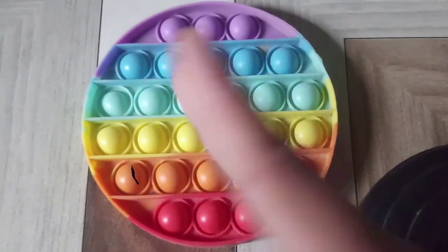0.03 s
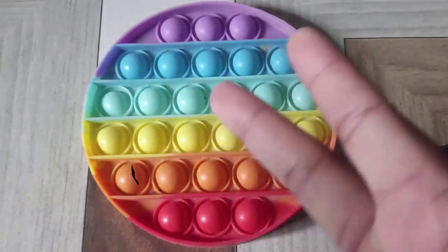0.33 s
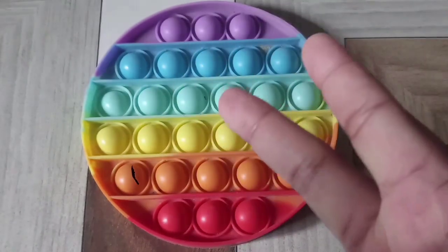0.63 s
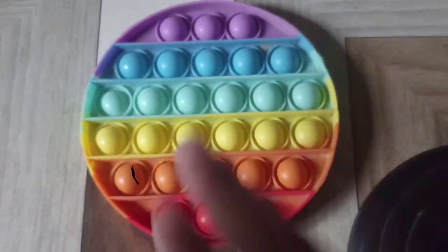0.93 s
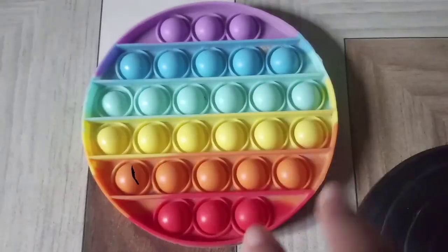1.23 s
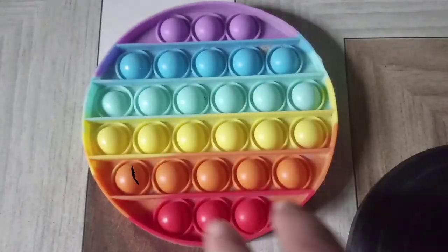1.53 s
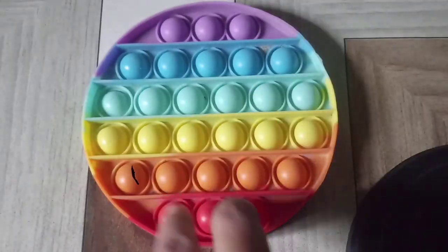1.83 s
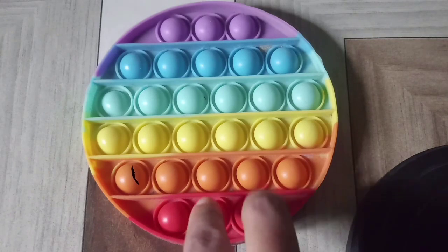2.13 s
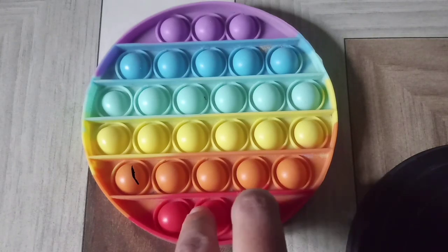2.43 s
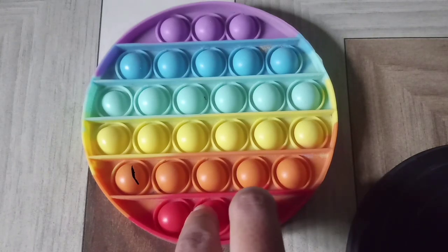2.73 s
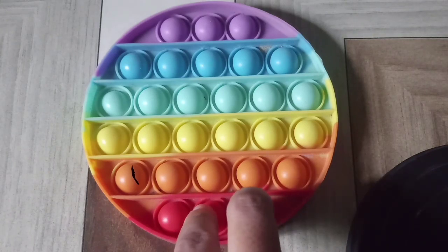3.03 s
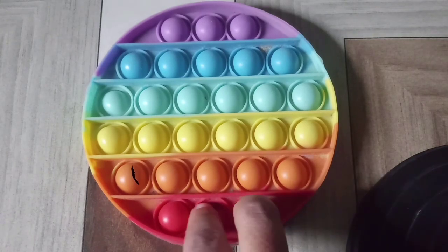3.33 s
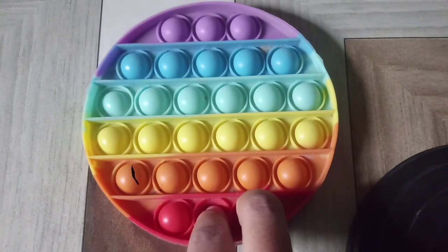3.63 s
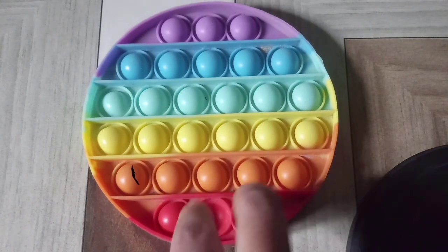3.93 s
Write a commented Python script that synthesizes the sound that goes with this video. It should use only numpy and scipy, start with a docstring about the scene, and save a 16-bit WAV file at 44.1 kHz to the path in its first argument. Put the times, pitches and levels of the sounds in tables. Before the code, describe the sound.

A silicone bubble toy pops twice, close to the microphone in a bare room. At first there is only faint hiss and low rumble. From about 1 to 2.5 seconds fingers rub very softly on the toy, with a tiny tick. The two sharp pops come at about 3.1 and 3.4 seconds, each ringing briefly in the room. A last faint tick and rub follow near 3.9 seconds.

```python
"""A silicone bubble toy on the floor of a bare room, one small microphone close to it.
At first there is only faint hiss and a rumble that swells in the room's low resonances.
From about a second in, two fingers settle on the toy, rub on it and press. Just after three seconds
two domes snap through, one after the other: each a millisecond crack that bounces off the floor and
the near walls and rings out in the room. A last tick and rub follow as the hiss sinks."""
import sys
import numpy as np
from scipy import signal
from scipy.fft import rfft, irfft, next_fast_len
from scipy.io import wavfile
from scipy.ndimage import map_coordinates

SR = 44100
rng = np.random.default_rng(int(sys.argv[2]) if len(sys.argv) > 2 else 0)


def to_wav(s):
    """Save 16-bit WAV."""
    ch = np.atleast_2d(s).T  # columns
    pcm = np.round(np.clip(ch, -1, 1) * 32767)  # PCM
    wavfile.write(sys.argv[1], SR, pcm.astype(np.int16))


N = 176400

# spectra of the room's hiss and steady rumble: frequency_hz, relative_db
HISS_SPECTRUM = [(150, -11.5), (300, 1.5), (450, -4), (700, -5.5), (1000, -9), (1600, -13.5), (3000, -14.5),
                 (4300, -14.5), (5500, -21.5), (6500, -17.5), (7100, -10), (7700, -20), (10000, -22.5),
                 (15500, -27)]
RUMBLE_SPECTRUM = [(20, -18.5), (35, -14), (50, -8), (70, -2), (85, -5.5), (100, 2), (135, -3), (165, -14),
                   (200, -12), (300, -21), (400, -40.5)]
# course of the hiss: time_s, level_db
HISS_LEVEL = [(0, -72), (.7, -74), (1.3, -71.5), (2.9, -73.5), (3.4, -73), (3.75, -77.5), (4, -81.5)]
# swells of the room's low resonances: middle_s, half_length_s, pitch_hz, level_db
ROOM_SWELLS = [(0.292, .055, 104.9, -52.5), (.49, .05, 134.2, -57), (.64, 0.048, 104, -59),
               (1.1, 0.063, 103.3, -51.5), (1.1, 0.065, 137.3, -64), (1.432, 0.12, 98.1, -56.5),
               (1.41, 0.086, 139.2, -66.5), (2.15, 0.063, 198, -58), (2.202, 0.092, 224.7, -57),
               (2.16, 0.081, 119.4, -64), (2.66, .07, 132, -53), (2.78, .06, 102, -57),
               (3.09, .07, 133.4, -57.5), (3.208, 0.069, 98.4, -53.5), (3.38, 0.056, 98.2, -56.5),
               (3.758, 0.052, 105.8, -56.5)]
RUMBLE_DB, WANDER_RAD, WANDER_KNOTS_PER_S = -63.5, 0.45, 14

# soft rubs on the toy and, in the 217 Hz row, a low swell of the room's resonance:
# middle_s, half_length_s, centre_hz, half_width_hz, glide_hz_per_s, level_db
NOISE_SWELLS = [(1.102, .05, 3360, 200, -3, -81.5), (1.279, 0.097, 3560, 110, -1400, -78),
                (1.404, .05, 2930, 600, -4000, -77), (1.736, 0.04, 4980, 453, 5, -72),
                (1.741, 0.066, 7250, 1500, 0, -73.5), (1.753, 0.077, 1390, 805, 1, -75.5),
                (1.84, .13, 620, 80, -2, -72), (2.102, 0.049, 3370, 400, 2, -79),
                (2.311, 0.083, 4600, 650, -2500, -76.5), (2.438, 0.17, 638, 70.5, -200, -67),
                (2.484, 0.061, 2470, 494, -4, -79), (2.192, .09, 217, 45.7, -3, -57.5),
                (3.88, .03, 6800, 1500, 0, -78)]
# small ticks of the silicone: start_s, level_db
TICKS = [(2.195, -64), (3.855, -71)]
# spectrum of a tick: frequency_hz, relative_db
TICK_SPECTRUM = [(200, 8), (700, 10), (2000, -1), (5000, -7), (9000, -5), (14000, -39)]
TICK_T60_S = 0.24

# domes snapping through: start_s, gain_db, pitch_ratio, floor_bounce_ms, thud_db, tail_db, t60_ratio
POPS = [(3.1375, 4.6, 0.977, 0.48, -27.5, -27.5, 1.01), (3.4137, 4.6, 1.015, 0.46, -32.5, -29.5, 0.94)]
# modes of a dome: pitch_hz, relative_db, t60_s
DOME_MODES = [(2270, -16.5, .005), (3750, -13, .0045), (5580, -1.5, 0.0031), (8200, -14.5, 0.0019),
              (11200, -26, .002)]
THUD_HZ, THUD_T60_S, SNAP_ATTACK_S, BOUNCE_DB = 540, .007, .00004, -7.5
# echoes off near walls and furniture: delay_s, gain_db
WALL_ECHOES = [(.0053, -22.5), (0.0105, -19.5), (0.0137, -22.5), (.0252, -22), (.028, -23)]
# spectrum of the room's tail, one list for each pop: frequency_hz, relative_db
TAIL_SPECTRA = [
    [(100, -63.5), (170, -19.5), (260, -10), (400, -15), (540, -19.5), (730, -9), (900, -17), (1100, -16),
     (1550, -17.5), (1850, -8), (2800, -10), (3800, -4), (5200, -0.5), (6200, -4), (7300, -9), (8700, -14),
     (9600, -27.5), (15000, -36)],
    [(100, -60.5), (170, -21.5), (240, -9), (400, -13), (620, -10.5), (900, -32), (1250, -14), (1550, -15),
     (1850, -8), (2800, -11), (3800, -6.5), (5300, 0), (6200, -3), (7300, -5), (8700, -9.5), (9600, -21),
     (12000, -22.5), (15000, -36.5)],
]
# reverberation time of the bare room: frequency_hz, t60_s
ROOM_T60 = [(250, .38), (800, 0.5), (1900, 0.58), (3200, 0.53), (5500, .57), (8500, 0.46), (10000, 0.28),
            (14000, .35)]
EARLY_DB, EARLY_T60_S, ROOM_BUILD_S = 5, 0.14, 0.0046  # the first dense reflections die faster

MIC_LOW_HZ, MIC_HIGH_HZ = 220, 8800
PEAK_CEILING, BAND_LIMIT_HZ = 1.2, 15600


def amp(db):
    """Decibels to gain."""
    return 10 ** (np.asarray(db) / 20)


def unit_rms(x):
    """Scaled to rms 1."""
    return x / np.sqrt(np.mean(x ** 2) + 1e-20)


def curve_at(points, hz):
    """(frequency_hz, value) points read on a log frequency axis."""
    knots_hz, values = np.transpose(points)
    return np.interp(np.log(hz + 1), np.log(knots_hz + 1), values)


def filtered(x, response):
    """x through a filter given as gain against frequency."""
    size = next_fast_len(len(x) + 8192)
    return irfft(rfft(x, size) * response(np.fft.rfftfreq(size, 1 / SR)), size)[:len(x)]


def noise(spectrum, count=N):
    """Coloured noise of rms 1."""
    return unit_rms(filtered(rng.standard_normal(count), lambda hz: amp(curve_at(spectrum, hz))))


def wobble(t, knots_per_s):
    """A smooth random curve."""
    return map_coordinates(rng.standard_normal(64), [t * knots_per_s], mode="mirror")


def swell(t, half_length_s):
    """A bell-shaped rise and fall around t = 0."""
    return np.exp(-.5 * (t / half_length_s) ** 2)


def add(track, start_s, sound):
    """Mix a sound in at start_s."""
    part = track[round(start_s * SR):][:len(sound)]
    part += sound[:len(part)]


def room_tone():
    """Hiss that sinks after the pops, and rumble that swells at the room's low resonances."""
    t = np.arange(N) / SR
    rumble = amp(RUMBLE_DB) * noise(RUMBLE_SPECTRUM)
    hiss = amp(np.interp(t, *np.transpose(HISS_LEVEL))) * noise(HISS_SPECTRUM)
    for middle_s, half_length_s, pitch_hz, level_db in ROOM_SWELLS:
        near = abs(t - middle_s) < .5
        offset_s = t[near] - middle_s
        wander = WANDER_RAD * wobble(offset_s + .5, WANDER_KNOTS_PER_S)
        hum = np.sqrt(2) * np.sin(2 * np.pi * pitch_hz * offset_s + wander)
        rumble[near] += amp(level_db) * swell(offset_s, half_length_s) * hum
    return rumble + hiss


def rubs_and_room_swell():
    """Swelling bands of noise: faint fingertip rubs, and the room's resonance once near 220 Hz."""
    out = np.zeros(N)
    t, hz = np.arange(SR) / SR - .5, np.fft.fftfreq(SR, 1 / SR)
    for middle_s, half_length_s, centre_hz, half_width_hz, glide_hz_per_s, level_db in NOISE_SWELLS:
        response = 1 / np.hypot(1, ((hz - centre_hz) / half_width_hz) ** 2)
        band = np.fft.ifft(np.fft.fft(rng.standard_normal(SR)) * response)
        glide = np.exp(1j * np.pi * glide_hz_per_s * t ** 2)  # slides the whole band
        sound = unit_rms(np.real(band * glide))
        add(out, middle_s - .5, amp(level_db) * swell(t, half_length_s) * sound)
    return out


def silicone_ticks():
    """The silicone ticks under the fingers: sudden, fading bursts of noise."""
    out, t = np.zeros(N), np.arange(SR) / SR
    for start_s, level_db in TICKS:
        add(out, start_s, amp(level_db - 60 * t / TICK_T60_S) * noise(TICK_SPECTRUM, count=SR))
    return out


def dome_snap(t, pitch_ratio, thud_db):
    """A dome flips: its damped modes and the hollow under it ring briefly and push the air."""
    t = np.maximum(t, 0)
    onset = 1 - np.exp(-t / SNAP_ATTACK_S)
    modes = DOME_MODES + [(THUD_HZ, thud_db, THUD_T60_S)]
    displacement = sum(amp(db - 60 * t / t60) * np.sin(2 * np.pi * hz * pitch_ratio * t) / (2 * np.pi * hz)
                       for hz, db, t60 in modes)
    return -np.gradient(displacement * onset) * SR


def microphone(hz):
    """The small microphone rolls off the bass and the top of each crack, 12 dB an octave."""
    low, high = 1j * hz / MIC_LOW_HZ, 1j * hz / MIC_HIGH_HZ
    bass_cut = low * low / (1 + np.sqrt(2) * low + low * low)
    return bass_cut / (1 + np.sqrt(2) * high + high * high)


def dome_pops():
    """Each snap reaches the microphone directly, then off the floor, the near walls and the room."""
    out, t = np.zeros(N), np.arange(SR // 10) / SR
    for pop, spectrum in zip(POPS, TAIL_SPECTRA):
        start_s, gain_db, pitch_ratio, floor_bounce_ms, thud_db, tail_db, t60_ratio = pop

        def crack(age_s):
            """The snap with its bounce off the floor."""
            bounce = dome_snap(age_s - floor_bounce_ms / 1000, pitch_ratio, thud_db)
            return dome_snap(age_s, pitch_ratio, thud_db) + amp(BOUNCE_DB) * bounce

        echoes = sum(amp(wall_db) * crack(t - delay_s) for delay_s, wall_db in WALL_ECHOES)
        add(out, start_s, amp(gain_db) * filtered(crack(t) + echoes, microphone))
        add(out, start_s, amp(tail_db) * room_tail(spectrum, t60_ratio))
    return out


def room_tail(spectrum, t60_ratio):
    """The room's diffuse answer to one snap; each frequency dies at its own speed."""
    hz, t, bands = signal.stft(noise(spectrum, count=SR), SR, nperseg=256)
    late = amp(-60 * t / (t60_ratio * curve_at(ROOM_T60, hz)[:, None]))
    early = amp(EARLY_DB - 60 * t / EARLY_T60_S)
    tail = signal.istft(bands * np.hypot(late, early), SR, nperseg=256)[1][:SR]
    build_up = 1 - np.exp(-np.arange(SR) / SR / ROOM_BUILD_S)
    return tail * build_up


def scene():
    """Toy and room at one close microphone."""
    return (dome_pops() + rubs_and_room_swell() + silicone_ticks() + room_tone())[None]


def record(dry):
    """The recorder rounds off the highest peaks and keeps nothing above its band limit."""
    rounded = dry[0] / (1 + (dry[0] / PEAK_CEILING) ** 8) ** (1 / 8)
    return filtered(rounded, lambda hz: 1 / np.sqrt(1 + (hz / BAND_LIMIT_HZ) ** 160))[None]


dry = scene()
out = record(dry)
to_wav(out)
```